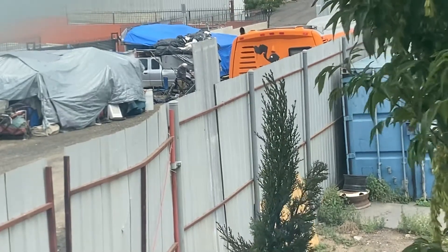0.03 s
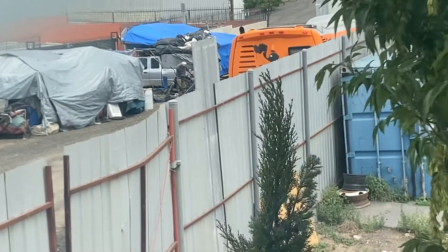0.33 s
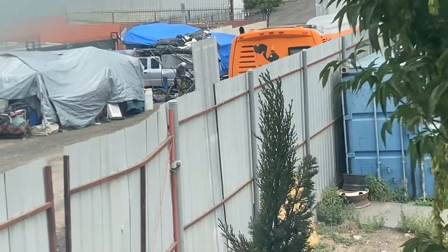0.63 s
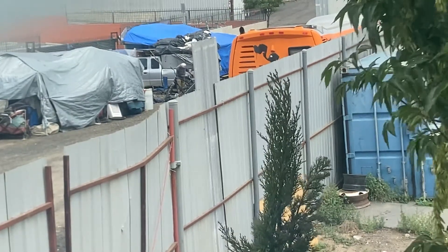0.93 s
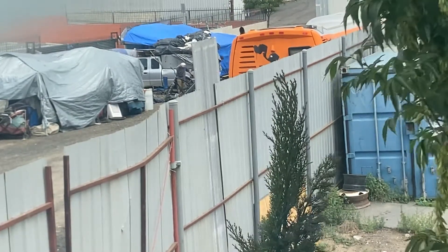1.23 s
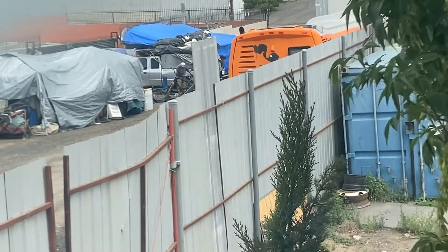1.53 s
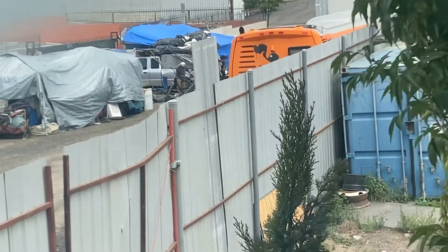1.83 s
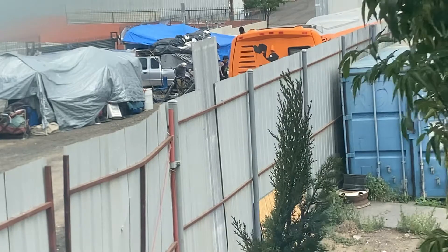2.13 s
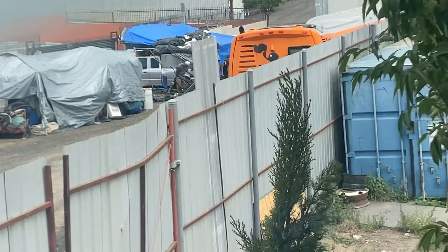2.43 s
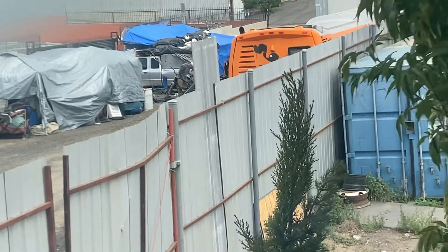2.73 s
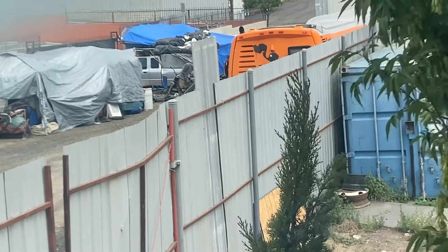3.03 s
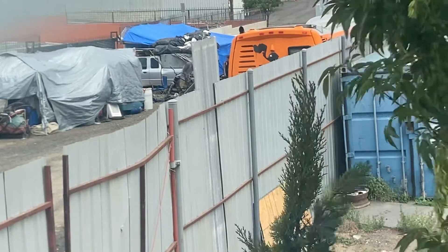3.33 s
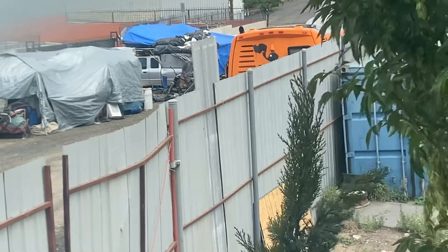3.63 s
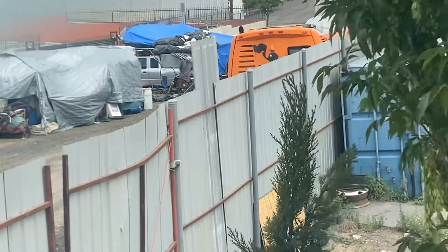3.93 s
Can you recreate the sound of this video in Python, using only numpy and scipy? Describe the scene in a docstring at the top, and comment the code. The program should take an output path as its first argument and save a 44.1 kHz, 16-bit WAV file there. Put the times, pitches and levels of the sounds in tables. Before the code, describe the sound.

Two sharp, distant hammer knocks on metal echo across an outdoor yard, a little over a second apart. Behind them town traffic rumbles, far machines drone and an engine idles, while a second engine hum rises near the end.

```python
"""Distant hammering across a yard

Two hammer blows land on metal, far off to the right. Each cracks and makes the metal ring;
fences and walls throw back a short scatter of echoes. Faint high ticks follow the first blow.
Behind them town traffic rumbles, far machines drone, one engine idles and another swells and fades."""
import sys
import numpy as np
from scipy import signal
from scipy.fft import rfft, irfft
from scipy.io import wavfile

SR = 44100
rng = np.random.default_rng(int(sys.argv[2]) if len(sys.argv) > 2 else 0)


def master(y):
    """Save y as 16-bit WAV."""
    cut = np.clip(np.atleast_2d(y).T, -1, 1)
    pcm = np.round(cut * 32767)  # scale
    wavfile.write(sys.argv[1], SR, pcm.astype(np.int16))


N = 176400
TIME = np.arange(N) / SR
FREQS = np.maximum(np.fft.rfftfreq(N, 1 / SR), 1)

# Microphone hiss: f/Hz, level/dB per Hz
HISS_SPECTRUM = [(100, -122), (3000, -124), (4700, -124), (7000, -127.5), (9200, -131), (10700, -125),
                 (13000, -129)]
# Traffic rumble: f/Hz, level/dB per Hz
TRAFFIC_SPECTRUM = [(23, -93), (32, -69.5), (41, -71), (54, -64), (68, -71.5), (82, -70.5), (100, -74),
                    (120, -74.5), (155, -77), (260, -79.5), (315, -76), (370, -85), (470, -87),
                    (660, -87.5), (800, -93.5), (980, -92), (1130, -99), (1350, -93.5), (1600, -101),
                    (1950, -113), (2300, -117), (2650, -114), (3200, -126), (6000, -140)]
# How alike the rumble is on the left and right: f/Hz, likeness/0-1
TRAFFIC_LIKENESS = [(60, 0.95), (180, 1), (300, 0.93), (550, .5), (1000, 0.8), (1600, 1), (2600, 0.19)]
# Rise and fall of the whole rumble: t/s, level/dB
TRAFFIC_LEVEL = [(0, -.5), (.7, -1.6), (1.4, 0.45), (2.1, 0.36), (2.5, -0.48), (2.9, 0.95), (3.6, 0.99),
                 (4, 0.11)]
# Extra rise and fall of its low part: t/s, level/dB
BASS_LEVEL = [(0, -1), (.35, -1), (.55, 0), (.8, -0.5), (1.1, -1), (1.58, -0.5), (1.69, -2.5), (1.85, -1),
              (2.05, -1), (2.55, 0.5), (2.85, -1.5), (3.3, 1), (3.8, -3.5), (4, 5)]
# The same for its high part: t/s, level/dB
TREBLE_LEVEL = [(0, -2.5), (.75, -1), (1.4, -2.5), (1.9, 1), (2.15, 0.5), (2.35, 0), (2.8, -0.5), (3.1, -1),
                (3.6, -0.5), (4, -1)]
# Brief deep swells: t/s, level/dB, half length/s
SWELLS = [(0.75, -48, 0.1), (2.223, -44.5, 0.051)]
# Drones of far machines: f/Hz, width/Hz, level/dB, waver/dB
DRONES = [(260.3, 8.2, -66, 3.5), (312, 10, -66.5, 3), (479, 3.5, -76.5, 3.5), (515.6, 18, -77.5, 1.5),
          (651, 8, -78.5, -1.5), (1580, 250, -83.5, 2), (2550, 110, -93.5, 1)]
# Tones of the idling engine: multiple of the firing rate, level/dB
IDLE_TONES = [(1, -55), (2, -61.5), (3, -68.5), (4, -67), (5, -73)]
# How the working engine runs: t/s, firing rate/Hz, level/dB
WORKING_RUN = [(0, 63.78, -13.5), (2.1, 64.93, -19.5), (2.4, 64.86, -7.5), (2.7, 65.04, -1.5),
               (3.0, 64.36, -1.5), (3.5, 65.13, -5.5), (3.8, 64.46, -11), (4, 63.55, -8)]
# Its tones: multiple of the firing rate, level/dB
WORKING_TONES = [(2, -43.5), (3, -59), (4, -60.5), (5, -60.5), (6, -60.5), (7, -72), (8, -67), (10, -69)]
# Faint high ticks: t/s, level/dB
TICKS = [(0.492, -83.5), (0.5392, -82.5), (0.584, -84.5), (0.6299, -89.5), (0.6748, -85.5), (0.7207, -88.5)]
# Echo of the yard: f/Hz, level/dB per Hz
ECHO_SPECTRUM = [(250, -120), (600, -103), (1300, -103), (2400, -95.5), (3200, -102), (4300, -100.5),
                 (6000, -110), (8500, -122), (11000, -119), (13000, -128)]
# Time that echo takes to fade by 60 dB: f/Hz, fade/s
ECHO_FADES = [(700, 0.83), (2400, 0.54), (3500, 0.22), (6000, 0.25), (12000, 0.057)]
# Echoes off fences and walls: delay/s, level/dB, left over right/dB, dull above/Hz
WALLS = [(.0085, -6, 9, 7000), (.038, -14, -16, 3540), (.058, -30, 2, 3042), (.087, -15, 2, 1700),
         (.122, -22, 2, 1720)]
# Crack of a hit, scattered by fences: f/Hz, level at spot 0/dB per Hz, level at spot 1/dB per Hz
CRACK_SPECTRUM = [(250, -120, -120), (604, -99, -99), (1310, -83.5, -85), (1600, -100, -86),
                  (2360, -80.5, -93), (2800, -103, -79), (2970, -95, -85), (3400, -107, -78),
                  (4140, -81.5, -86), (5130, -108, -99), (6170, -107, -102), (8700, -114, -111),
                  (11000, -112, -102), (13000, -122, -117)]
# Tones of the struck metal: f/Hz, 60 dB fade/s, level at spot 0/dB, level at spot 1/dB
METAL_TONES = [(839, 0.17, 4, 0), (937, 0.11, -3, -16), (1288, 0.09, 3, 10), (1477, 0.1, -21, 1),
               (1840, 0.03, 3.5, -16), (1965, 0.11, -8.5, -10), (2320, 0.11, -2, -13),
               (2490, 0.14, -17, -7.5), (2934, 0.025, 9, -13), (2990, 0.13, -3, -9), (3257, 0.087, -34, -9),
               (3450, 0.076, -40, 8), (4140, 0.11, -12, -10), (4440, 0.07, -17, -15), (4750, 0.1, -16, -21),
               (5450, .06, -18.5, -22), (6050, 0.11, -28, -11), (6760, .07, -30, -14.5)]
# Hammer contacts; the first blow grazes then lands, the second lands then bounces:
# t/s, ring level/dB, rise/s, crack level/dB, echo level/dB, spot on the metal/0-1
CONTACTS = [(0.3056, -54.5, 0.01, -19, 0.5, 0.11), (0.3098, -62.5, 0.002, -5.5, 1.5, 0),
            (1.6662, -54.5, 0.0013, -6.5, 0.5, 0.94), (1.6728, -54.5, 0.0018, -9.5, -12, 0.38)]

ECHO_RISE_S = 0.023


def from_db(db):
    """Turn decibels into a factor to multiply by."""
    return 10 ** (np.asarray(db) / 20)


def in_time(rows):
    """Join a table's points with lines: one curve in time for each column after the first."""
    times, *columns = np.transpose(rows)
    return [np.interp(TIME, times, column) for column in columns]


def at_hz(points):
    """Spread (f/Hz, value) points over all frequencies, on a scale of octaves."""
    hz, values = np.transpose(points)
    return np.interp(np.log(FREQS), np.log(hz), values)


def drift(rate_hz):
    """A random wobble of typical size 1, mostly slower than rate_hz."""
    times = TIME[::100]
    smoothing = 1 + (np.fft.rfftfreq(len(times), times[1]) / rate_hz) ** 2
    slow = irfft(rfft(rng.standard_normal(len(times))) / smoothing, len(times))
    return np.interp(TIME, times, (slow - slow.mean()) / slow.std())


def noise(spectrum, likeness):
    """Stereo noise with the given spectrum; likeness 1 makes left and right the same."""
    shared, opposite = rfft(rng.standard_normal((2, N))) * from_db(at_hz(spectrum)) * np.sqrt(SR / 2)
    opposite = opposite * [[1], [-1]]
    return irfft(np.sqrt((1 + likeness) / 2) * shared + np.sqrt((1 - likeness) / 2) * opposite, N)


def peak(hz, width_hz):
    """A hump in the spectrum around one pitch."""
    return 1 / (1 + (2 * (FREQS - hz) / width_hz) ** 2)


def narrow_noise(hz, width_hz):
    """Noise around one pitch, of typical size 1."""
    x = irfft(rfft(rng.standard_normal(N)) * peak(hz, width_hz), N)
    return x / x.std()


def split_bands(x, centres_hz):
    """Split a sound into overlapping bands, low to high."""
    spectrum = rfft(x)
    return [irfft(spectrum * at_hz(list(zip(centres_hz, row))), N) for row in np.eye(len(centres_hz))]


def bump(t, half_s):
    """A smooth rise and fall that peaks at time t."""
    return np.exp(-.5 * ((TIME - t) / half_s) ** 2)


def strike(age, rise_s, fade_s, hold_s=0):
    """Loudness of a hit: it rises, and from hold_s on drops 60 dB every fade_s."""
    return np.clip(age / rise_s, 0, 1) * 1000 ** -np.clip((age - hold_s) / fade_s, 0, 2)


def pan(db):
    """Left and right factors; below 0 dB the right is louder."""
    return from_db(np.array([[.5], [-.5]]) * db)


def traffic_rumble(bass_below_hz=200, treble_above_hz=1100, flutter_db=2.22):
    """Far traffic blurs into noise; each band rises and falls a little by itself."""
    level_db, = in_time(TRAFFIC_LEVEL)
    bass_db, = in_time(BASS_LEVEL)
    treble_db, = in_time(TREBLE_LEVEL)
    wash = noise(TRAFFIC_SPECTRUM, at_hz(TRAFFIC_LIKENESS))
    centres_hz = np.geomspace(90, 2700, 11)
    out = 0
    for hz, band in zip(centres_hz, split_bands(wash, centres_hz)):
        band_db = level_db + bass_db * (hz < bass_below_hz) + treble_db * (hz > treble_above_hz)
        out += band * from_db(band_db + flutter_db * drift(7))
    return out


def machine_drones():
    """Far machines give wavering drones and a thin whine."""
    return sum(from_db(db + waver_db * drift(4.4)) * narrow_noise(hz, width_hz)
               for hz, width_hz, db, waver_db in DRONES)


def engine_hum(firing_hz, tones, wander=0.0039, flutter_db=0.15):
    """An engine fires at a slightly unsteady rate, making tones at multiples of that rate."""
    firings = np.cumsum(firing_hz * (1 + wander * drift(2.37))) / SR
    out = 0
    for multiple, db in tones:
        height = np.sqrt(2) * from_db(db + flutter_db * drift(16))
        out += height * np.sin(2 * np.pi * (multiple * firings + rng.random()))
    return out


def deep_swells():
    """A deep hum rises briefly out of the rumble, twice."""
    loudness = sum(from_db(db) * bump(t, half_s) for t, db, half_s in SWELLS)
    return loudness * engine_hum(firing_hz=56.05, tones=[(1, 0.046)])


def engines():
    """One engine idles evenly while a working one swells and fades."""
    idling = engine_hum(firing_hz=60.19, tones=IDLE_TONES)
    firing_hz, level_db = in_time(WORKING_RUN)
    return idling + from_db(level_db) * engine_hum(firing_hz, WORKING_TONES)


def ticks(half_s=0.0024):
    """A quick, fading run of tiny high ticks."""
    loudness = sum(from_db(db) * bump(t + half_s, half_s) for t, db in TICKS)
    return loudness * narrow_noise(hz=4550, width_hz=1500)


def yard_echo(patchy_db=2.5):
    """The yard's uneven wash of echo for a hit at time 0; the highs die first."""
    centres_hz, fades_s = np.transpose(ECHO_FADES)
    bands = split_bands(noise(ECHO_SPECTRUM, likeness=0.089), centres_hz)
    return sum(band * strike(TIME, ECHO_RISE_S, fade_s) * from_db(patchy_db * drift(45))
               for band, fade_s in zip(bands, fades_s))


def wall_echoes(x):
    """Each fence or wall sends back one late, duller copy."""
    paths = 0
    for delay_s, db, pan_db, dull_hz in WALLS:
        delay = np.exp(-2j * np.pi * FREQS * delay_s)
        paths += from_db(db) * pan(pan_db) * delay / (1 + 1j * FREQS / dull_hz)
    return irfft(rfft(x) * paths, N)


def metal_ring(age, rise_s, ring_db, spot, blur_db=-12.5, blur_hz=120, blur_fade_s=0.25):
    """The metal rings in a mix of tones set by the spot hit; the yard blurs them into an echo."""
    direct, blur_spectrum = np.zeros(N), 0
    ringing = (age > 0) & (age < 1)
    for hz, fade_s, db0, db1 in METAL_TONES:
        gain = from_db(ring_db + db0 + spot * (db1 - db0))
        tone = np.sin(2 * np.pi * (hz * age[ringing] + rng.random()))
        direct[ringing] += gain * tone * strike(age[ringing], rise_s, fade_s, hold_s=rise_s)
        blur_spectrum += gain * fade_s / blur_fade_s * peak(hz, blur_hz)  # long tones feed it most
    blur = irfft(rfft(rng.standard_normal((2, N))) * blur_spectrum * np.sqrt(SR / blur_hz), N)
    return direct + from_db(blur_db) * blur * strike(age, ECHO_RISE_S, blur_fade_s)


def crack(age, rise_s, crack_db, spot, rough_db=3):
    """The rough burst of noise from one contact, scattered by nearby fences."""
    grit = noise([(hz, db0 + spot * (db1 - db0)) for hz, db0, db1 in CRACK_SPECTRUM], likeness=0.57)
    gain = from_db(crack_db + rough_db * drift(250))
    return grit * gain * strike(age, rise_s, fade_s=0.088, hold_s=0.0036)


def hammer():
    """Each contact rings the metal, cracks and fills the yard with echo; the cracks bounce off walls."""
    yard = yard_echo()
    rings, cracks, echoes = 0, 0, 0
    for t, ring_db, rise_s, crack_db, echo_db, spot in CONTACTS:
        age = TIME - t
        rings += metal_ring(age, rise_s, ring_db, spot)
        cracks += crack(age, rise_s, crack_db, spot)
        echoes += from_db(echo_db) * np.array([np.interp(age, TIME, side) for side in yard])
    return (rings + cracks + echoes + wall_echoes(cracks.mean(axis=0))) * pan(db=-2.5)


def scene(left_lag_s=0.0004):
    """Everything comes from the right, so it reaches the left microphone a little late."""
    left, right = hammer() + ticks() + deep_swells() + machine_drones() + traffic_rumble() + engines()
    late_left = irfft(rfft(left) * np.exp(-2j * np.pi * FREQS * left_lag_s), N)
    return np.array([late_left, right])


def record(dry, cutoff_hz=13000):
    """The microphones add hiss, and the very highest sounds are cut off."""
    low_pass = signal.ellip(10, .1, 70, cutoff_hz, fs=SR, output="sos")
    return signal.sosfilt(low_pass, dry + noise(HISS_SPECTRUM, likeness=0.055))


dry = scene()
out = record(dry)
master(out)
```